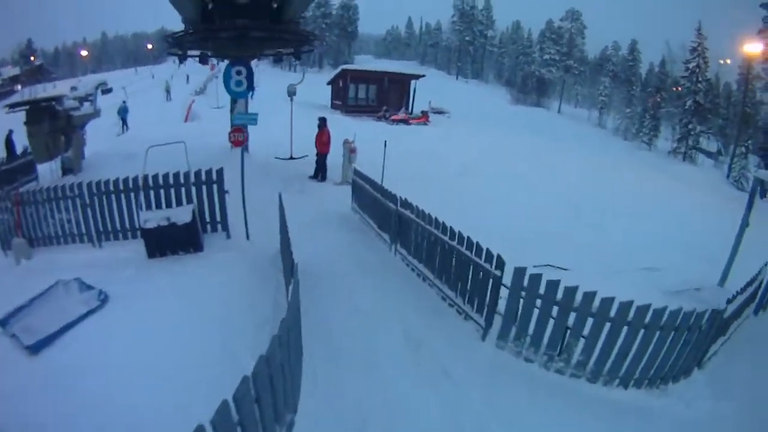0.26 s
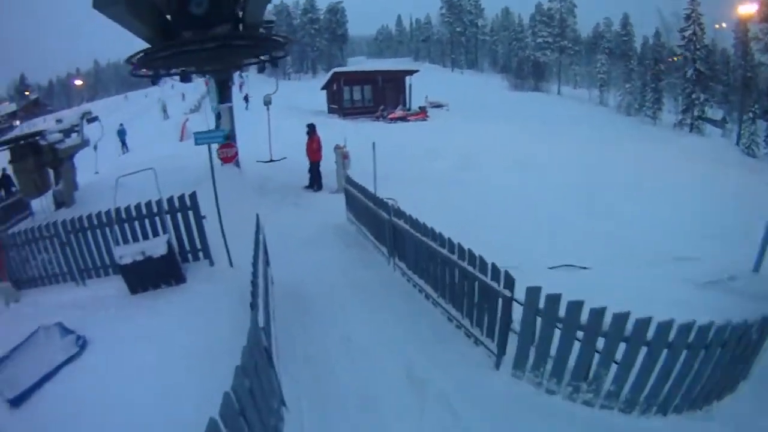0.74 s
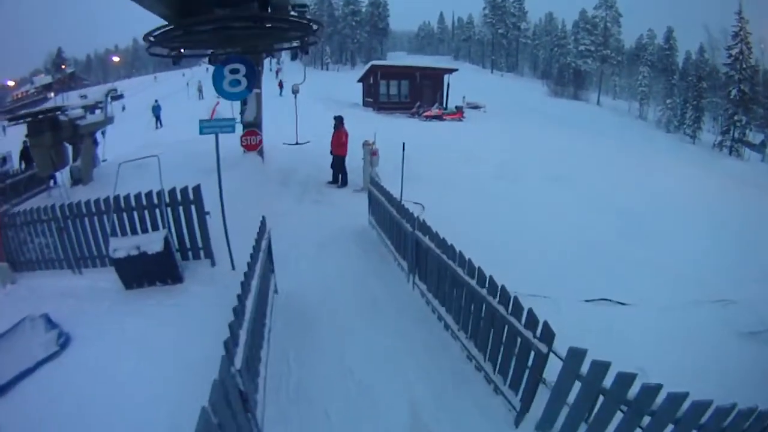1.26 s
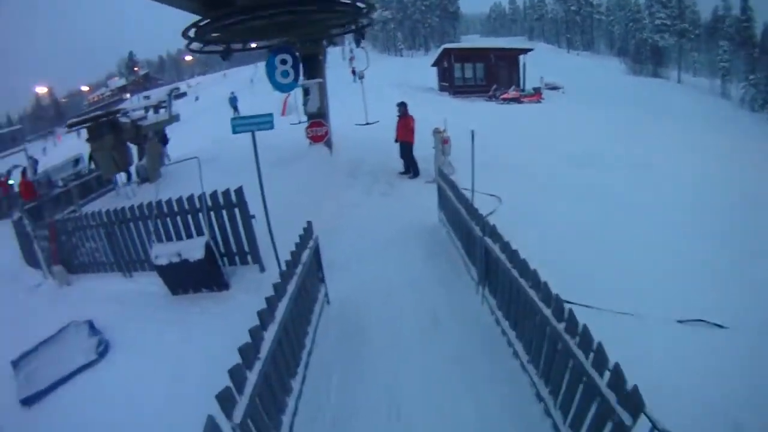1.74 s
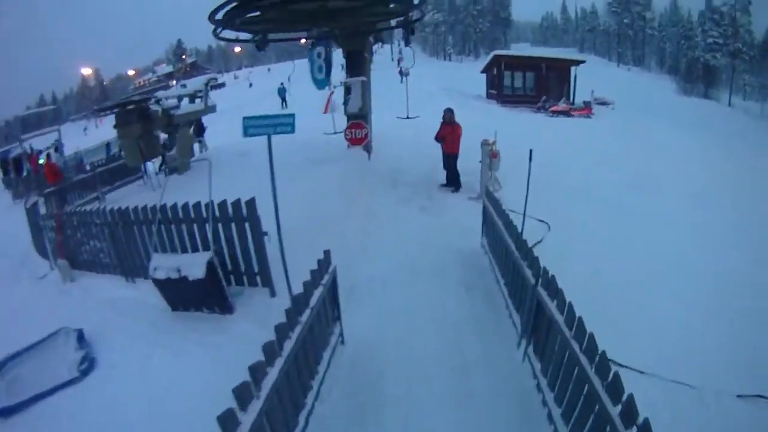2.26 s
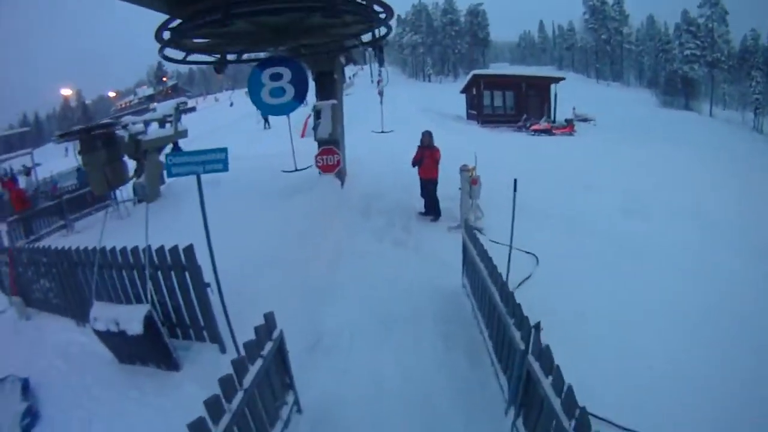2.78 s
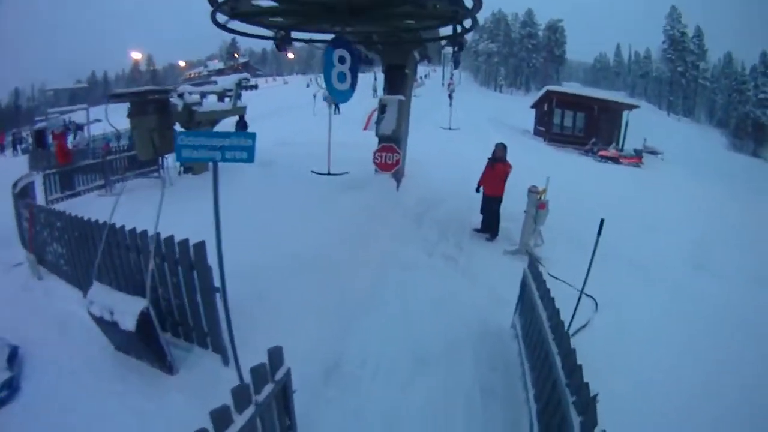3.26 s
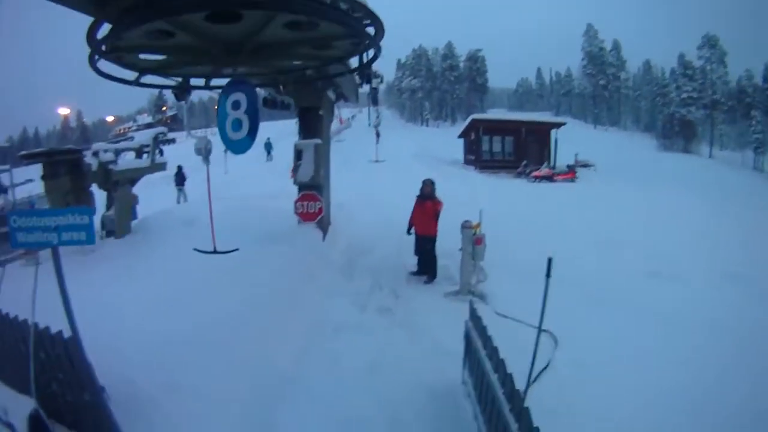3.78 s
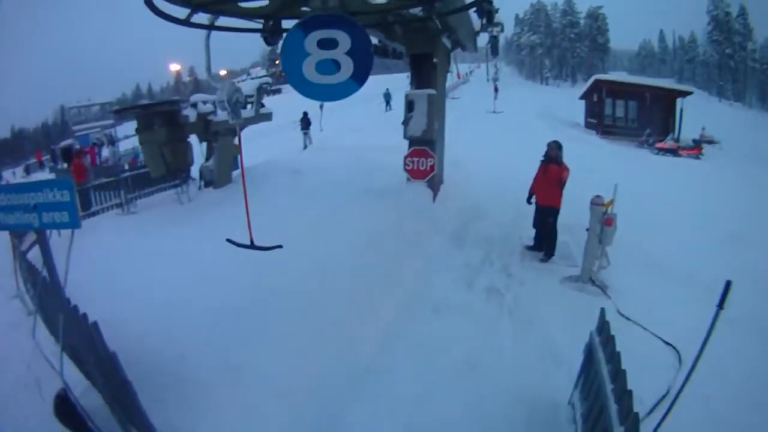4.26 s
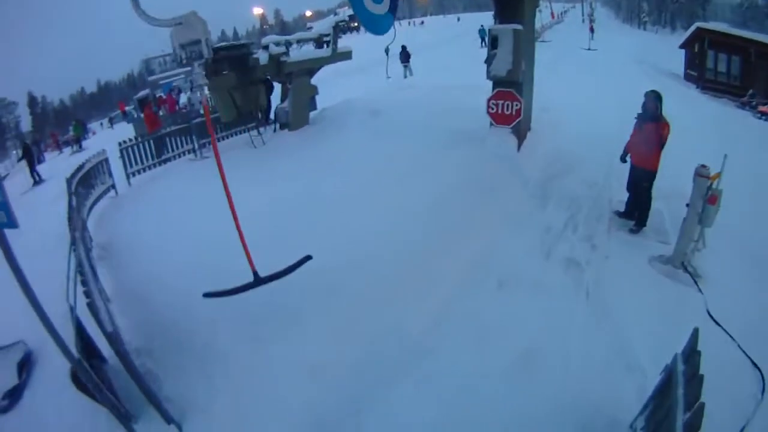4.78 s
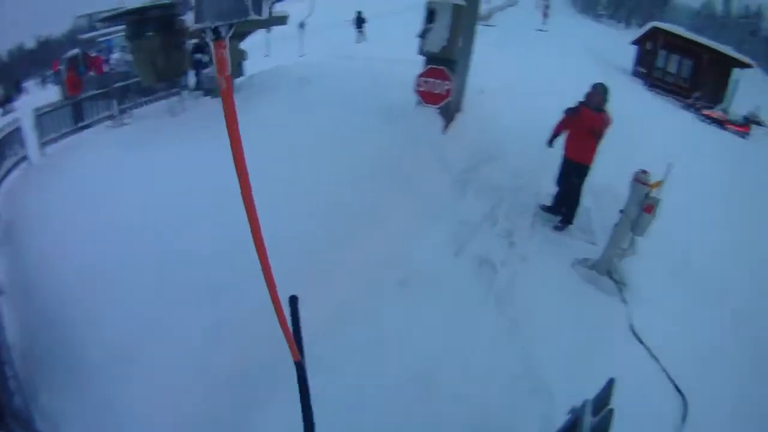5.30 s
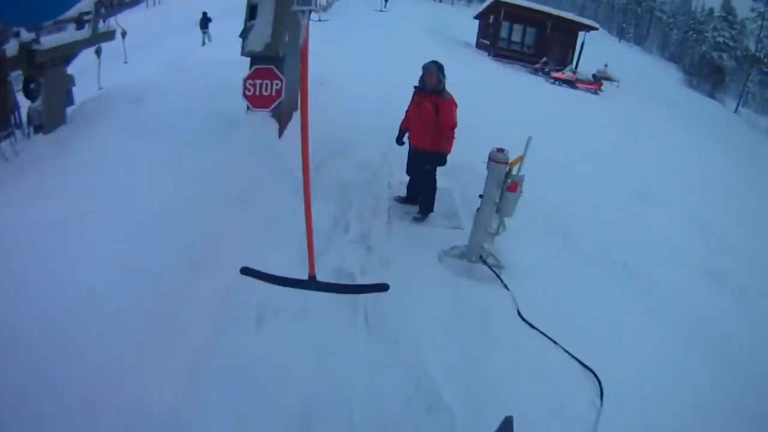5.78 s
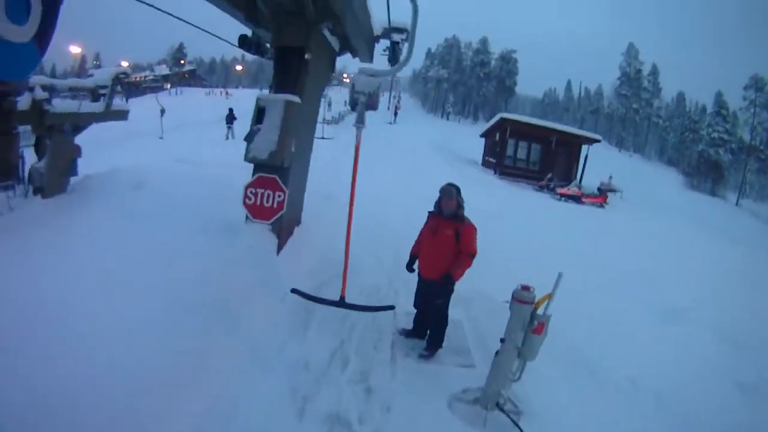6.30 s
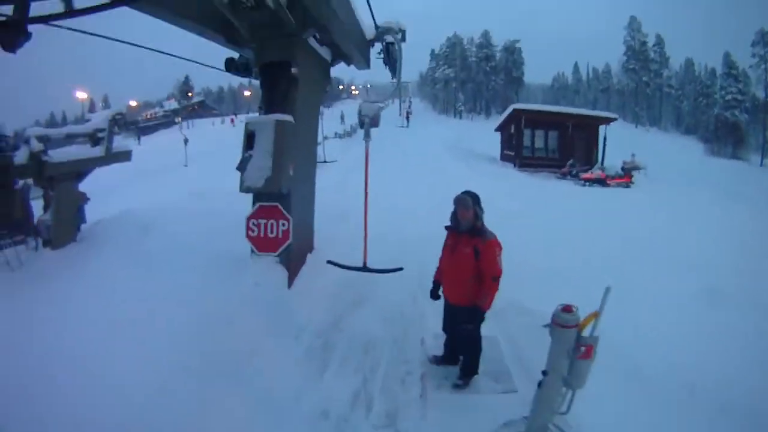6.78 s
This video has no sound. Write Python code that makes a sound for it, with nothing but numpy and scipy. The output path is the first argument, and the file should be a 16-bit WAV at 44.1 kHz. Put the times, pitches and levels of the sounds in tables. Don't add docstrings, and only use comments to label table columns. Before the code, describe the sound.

A ski-lift station hums and roars steadily, growing louder as skis hiss over snow, with two sharp cracks and a short braking squeal.

```python
import sys
import numpy as np
from scipy import signal
from scipy.fft import rfft, irfft, next_fast_len
from scipy.io import wavfile

SR = 44100
rng = np.random.default_rng(int(sys.argv[2]) if len(sys.argv) > 2 else 0)


def pcm_store(signal):
    levels = np.round(np.clip(np.atleast_2d(signal), -1, 1) * 32767)
    wavfile.write(sys.argv[1], SR, levels.astype(np.int16).T)


def ratio(d):
    e = np.asarray(d, float) / 20
    return 10 ** e


N = 310884


def rms_one(x):
    return x / np.sqrt(np.mean(x ** 2) + 1e-20)


def in_time(rows):
    seconds, *columns = np.transpose(rows)
    return [np.interp(np.arange(N) / SR, seconds, column) for column in columns]


def drift(rate_hz):
    r = np.exp(-80 * np.pi * rate_hz / SR)
    noise = rng.standard_normal(N // 40 + 2002)
    slow = signal.lfilter([1], [1, -2 * r, r * r], noise)[2000:]
    return np.interp(np.arange(N) / 40, np.arange(len(slow)), rms_one(slow))


def zone(centre_s, half_width_s):
    t = np.arange(0, N, 64) / SR
    return np.exp(-((t - centre_s) / half_width_s) ** 2).repeat(64)[:N]


def resonate(x, hz, width_hz):
    r = np.exp(-np.pi * width_hz / SR)
    poles = [1, -2 * r * np.cos(2 * np.pi * hz / SR), r * r]
    return signal.lfilter([(1 - r * r) / 2, 0, (r * r - 1) / 2], poles, x)


def band(x, low_hz, high_hz):
    return signal.sosfilt(signal.butter(2, [low_hz, high_hz], "band", fs=SR, output="sos"), x)


def response(spectrum, low_hz, high_hz, size=16384):
    hz = np.maximum(np.arange(size // 2 + 1) * SR / size, 1)
    points = np.array(spectrum)
    log_gain = np.log(ratio(np.interp(np.log(hz), np.log(points[:, 0]), points[:, 1])))
    inside = (hz > low_hz) & (hz < high_hz)
    log_gain -= np.log(np.sum(np.exp(2 * log_gain[inside])) / len(hz)) / 2
    cepstrum = irfft(log_gain, size)
    cepstrum[1:size // 2] *= 2
    return irfft(np.exp(rfft(cepstrum[:size // 2], size)), size)[:size // 2]


def coloured(x, spectrum, low_hz, high_hz):
    return signal.oaconvolve(x, response(spectrum, low_hz, high_hz))[:N]


def by_place(x, spectra, place, low_hz, high_hz):
    return sum(np.clip(1 - abs(place - k), 0, 1) * coloured(x, spectrum, low_hz, high_hz)
               for k, spectrum in enumerate(spectra))


def patchy(x, patchy_db, common_db, count=22):
    size = next_fast_len(N)
    hz = np.maximum(np.arange(size // 2 + 1) * SR / size, 20)
    position = np.log2(hz / 20) / 10 * (count - 1)
    spectrum, together = rfft(x, size), drift(13.0)
    out = 0
    for k in range(count):
        part = irfft(spectrum * np.clip(1 - abs(position - k), 0, 1), size)[:N]
        out = out + ratio(common_db * together + patchy_db * drift(2.06)) * part
    return out


def grains(per_s, spread_db):
    sizes = ratio(spread_db * np.minimum(rng.exponential(1, N), 5)) * rng.choice([-1, 1], N)
    return rms_one(sizes * (rng.random(N) < per_s / SR))


def contacts(click_share):
    clicks = grains(900 * ratio(3.0 * drift(25)), spread_db=3.0)
    return rms_one(click_share * clicks + rng.standard_normal(N))


def knocks(rows, t60_s, rise_ms):
    out, t = np.zeros(N + 4096), np.arange(4096) / SR
    for s, db, hz in rows:
        push = 1 - np.exp(-1000 * t / max(rise_ms, .2))
        ring = push * ratio(-60 * t / t60_s) * np.sin(2 * np.pi * hz * t + rng.uniform(0, 2 * np.pi))
        out[round(s * SR):][:4096] += ratio(db - 7.5) * ring / abs(ring).max()
    return out[:N]


def point_contacts(rows):
    out, impulse = np.zeros(N + 1024), np.eye(1, 1024)[0]
    thud = band(impulse, 900, 4600)
    for s, db, hz, width_hz, thud_db in rows:
        ring = resonate(band(impulse, 0.55 * hz, 1.45 * hz), hz, width_hz)
        out[round(s * SR):][:1024] -= ratio(db) * (ring / abs(ring).max() + ratio(thud_db) * thud / thud.max())
    return out[:N]


def gearbox(place):
    # seconds, level of the hum in dB rms; the third order lies 2.5 dB above it
    hum = [(0, -68), (.5, -69), (1.0, -80), (1.5, -65.5), (1.7, -65.5), (2.4, -62), (2.85, -65),
           (3.15, -66.5), (3.45, -62), (4.08, -60), (4.25, -58.5), (4.8, -54.5), (5.0, -59.5), (5.6, -57.5),
           (5.72, -62), (6.1, -68.5), (6.6, -71.5), (7.05, -59)]
    # multiple of the tooth rate, level in dB, share of the hum's swing, dB per place
    low_orders = [(1, -78.5, 0.27, 10), (2, -75.5, 0.71, 6.5)]
    # multiple of the tooth rate, dB re the hum, dB per place
    upper_orders = [(4, -8.5, -10.5), (5, -11, -8.5), (6, -1.5, -5), (7, -17, -2), (9, -6, 4)]
    # multiple of the tooth rate, centre in s, half width in s, gain in dB
    zones = [(1, 1.8, 0.94, 4), (1, 4.9, 0.2, -4), (1, 2.8, 0.28, -5.5), (3, 4.92, 0.055, -21),
             (3, 5.5, 0.13, 7), (3, 6.3, 0.037, 14), (3, 4.4, 0.037, -0.5), (2, 7.5, 0.047, -11),
             (1, 4.6, 0.24, 2), (2, 1.5, .2, 7.5), (2, 3.67, 0.45, 6), (2, 2.9, 0.17, 6),
             (2, 7.7, 0.15, -6), (2, 7, 0.16, -1.5), (4, 5, .35, 1.5), (5, 1.63, .2, 16),
             (5, 2.45, 0.26, 12), (5, 3.1, .25, 15), (5, 4.34, 0.27, 7.5), (6, 2.1, .5, 4.5),
             (6, 5.4, .35, -6.5), (6, 4.4, 0.18, 5), (7, 2.86, 0.27, 13), (7, 3.7, 0.21, 18.5),
             (7, 3.2, .15, 10), (2, 5.6, .25, -4), (9, 2.45, .1, 7), (9, 4.1, .15, 2.5), (9, 10, .12, 8),
             (9, 6.8, .2, 8), (9, 5.5, .15, 6.5), (2, 5.5, .15, -15), (1, 5.7, 0.22, 1.5), (1, 8.7, .1, 1),
             (3, 4.5, 0.054, 3), (3, 5.2, .1, -2), (3, 5.58, .06, 2), (1, 0.059, .15, -10),
             (2, 1.25, .12, 1), (2, 3.8, .12, -5), (3, 4.47, 0.065, -3), (3, 5.1, .05, -4),
             (3, 5.8, .04, -1), (3, 4.04, 0.041, -8), (1, 6.75, .25, -3.5), (1, 2.24, .1, -4),
             (3, 2, 0.13, -1)]
    tooth_hz, hum_mean_db, low_fading_db = 185.25, -62, 1.2
    turn = 2 * np.pi * tooth_hz * np.arange(N) / SR + .15 * drift(3) + .07 * drift(25)
    hum_db, = in_time(hum)
    orders = [(k, db + share * (hum_db - hum_mean_db) + stage_db * place + low_fading_db * drift(4.6))
              for k, db, share, stage_db in low_orders]
    orders += [(3, hum_db + 2.5)]
    orders += [(k, hum_db + db + stage_db * place) for k, db, stage_db in upper_orders]
    teeth = 0
    for k, db in orders:
        zone_db = sum(gain_db * zone(s, width_s) for j, s, width_s, gain_db in zones if j == k)
        teeth = teeth + ratio(db + zone_db + 2.1 * drift(9.9)) * np.sin(k * turn + rng.uniform(0, 2 * np.pi))
    return np.sqrt(2) * teeth


def motor():
    t, under = np.arange(N) / SR, zone(6.43, 0.69)
    return np.sqrt(2) * sum(ratio(db + gained_db * under + 2.7 * drift(5.2)) * np.sin(2 * np.pi * hz * t)
                            for hz, db, gained_db in [(200.5, -83, 18), (300, -79.5, 9)])


def sheave_whines(near_db):
    # frequency in Hz, level in dB rms, wander in Hz, flutter in dB, end of the fade-out in s
    bearings = [(1242, -63, 6.0, 3.5, 5.4), (1390, -66, 7.97, 1.5, 4.7), (1664, -60.5, 6.96, 3.5, 7.5),
                (2425, -69, 14.94, 4, 4.97), (4160, -74.5, 15.0, 3.0, 5.0)]
    t, fade_s, out = np.arange(N) / SR, .25, 0
    for hz, db, wander_hz, flutter_db, end_s in bearings:
        level = ratio(db + .8 * near_db + flutter_db * drift(6.2)) * np.clip((end_s - t) / fade_s, 0, 1)
        out = out + level * np.sin(2 * np.pi * np.cumsum(hz + wander_hz * drift(4.01)) / SR)
    return np.sqrt(2) * out


def rope_roar(near_db, place):
    # frequency in Hz, density in dB per Hz
    colours = [
        [(350, -35), (600, -7.5), (782, -10), (920, -3.5), (999, -6), (1260, -1), (1490, -2), (1630, -3),
         (1720, -7.5), (1830, -5), (2110, -8.5), (2380, -7), (2600, -21), (2700, -27), (3510, -17.5),
         (5940, -120)],
        [(350, -34.5), (600, -8), (647, -17.5), (870, -12.5), (1030, -15), (1210, -8.5), (1310, -11),
         (1450, -11.5), (1650, -3.5), (1720, -5), (1780, -11.5), (2020, -23), (2430, -17.5), (2700, -27),
         (3510, -58.5), (5940, -120)],
        [(350, -45), (600, -9), (875, -14), (1070, -6), (1160, -18), (1360, -8.5), (1440, -4), (1640, -1),
         (1720, -7), (1780, -5.5), (1970, -6), (2180, -23.5), (2520, -34), (2700, -15), (3510, -48),
         (5940, -120)],
    ]
    rubbing = patchy(contacts(click_share=0.28), patchy_db=0.8, common_db=0.57)
    return ratio(-52 + 0.82 * near_db - 0.081 * place) * by_place(rubbing, colours, place, 564, 1377)


def casing_rattle(near_db, place):
    # mode in Hz, width in Hz, level in dB, dB per place, share of the shake
    modes = [(1689, 7.1, 1.5, -0.5, 0.92), (1660, 51, 5, -3.5, 1), (1590, 16, -4.5, 4, 0.28),
             (1234, 12, -4, -2.5, 0.26), (2415, 70, -1.5, -5, .1), (4210, 40, -13, 0, .1),
             (291.6, 32, -24, 9.5, .5), (552, 35, -8, 1, .1), (1394, 12, -9, -1, 0.11)]
    # seconds, level in dB re mean
    shake = [(0, -5), (.25, -20), (.8, 1.5), (1.35, -4.5), (1.55, -9), (1.85, -2), (2.2, -3), (2.33, 0),
             (2.36, 10.5), (2.56, 2), (2.62, -8), (2.85, -5), (3.26, 4.5), (3.5, -11), (4.0, 1), (4.65, 0),
             (5.46, -13), (6.0, 7.5), (6.3, 9.5), (6.55, 9), (7.05, -13)]
    shaking, (shake_db,) = contacts(click_share=0.13), in_time(shake)
    level_db = -53 + 0.24 * near_db + 1.2 * place - 1.6 * drift(5.1)
    rung = 0
    for k, (hz, width_hz, db, stage_db, share) in enumerate(modes):
        mode = rms_one(resonate(shaking, hz, width_hz))
        rung = rung + (-1) ** k * ratio(db + stage_db * place + share * shake_db) * mode
    return ratio(level_db - 8.5) * rung


def rope_gear():
    # start in s, peak in dB, ring in Hz
    gear = [(1.043, -36.5, 1664), (1.5943, -35, 1607), (2.36, -32, 1620), (2.6958, -34, 1655),
            (3.4074, -33.5, 1590), (3.8471, -34, 1650), (3.9813, -38, 1670), (4.189, -35, 1660),
            (4.3414, -32, 1640), (4.5238, -28, 1684), (4.797, -43, 1600), (5.0582, -42, 1630),
            (5.1606, -37, 1710), (5.3117, -49, 1590), (5.4734, -41, 1590), (5.6404, -31, 1676),
            (5.6636, -26, 1663), (5.693, -48, 1600), (5.8174, -29.5, 1650), (5.885, -30, 1660),
            (5.9032, -33, 1665), (5.9975, -28.5, 1676), (6.1594, -47, 1690), (6.2951, -29, 1645),
            (6.4633, -35, 1647), (6.733, -36, 1620), (6.8144, -33, 1645), (6.786, -34, 1610),
            (5.7337, -42, 1760), (0.335, -34, 1600), (.754, -37, 1570), (1.717, -40, 1590),
            (1.898, -37, 1570), (2.138, -38, 1670), (2.531, -36, 1665), (2.805, -35, 1617),
            (2.952, -38, 1660), (3.039, -35, 1656), (3.274, -37, 1530), (3.386, -34, 1620),
            (3.482, -34, 1655), (3.945, -32, 1674), (4.838, -29.5, 1647), (5.125, -32, 1634),
            (5.526, -34, 1664), (.321, -42, 1240), (.752, -49, 1360), (1.113, -51, 1320),
            (1.726, -39, 1260), (1.989, -35.5, 1220), (2.454, -41, 1270), (2.545, -43, 1280),
            (2.819, -40, 1400), (4.906, -39, 1230), (4.012, -47, 917), (.075, -41, 835), (5.31, -45, 1650),
            (5.58, -46, 1650), (5.71, -33, 1640)]
    # start in s, peak in dB, ring in Hz
    jangle = [(6.09, -48, 1190), (6.118, -39, 1120), (6.186, -40, 970), (6.254, -37, 980),
              (6.307, -38, 1050), (6.346, -37, 1030), (6.381, -38, 1060), (6.445, -45, 1040),
              (6.608, -38, 1224)]
    # start in s, peak in dB, ring in Hz
    clanks = [
        (2.3585, -39, 1400),
        (0.5208, -26.5, 1630),
        (6.8476, -28, 1650),
    ]
    return (knocks(gear, t60_s=0.095, rise_ms=1.1) + knocks(jangle, t60_s=.028, rise_ms=4.7)
            + knocks(clanks, t60_s=0.025, rise_ms=.4))


def cracks():
    # start in s, peak in dB
    blows = [
        (3.8814, 1.5),
        (4.592, -11),
    ]
    # frequency in Hz, density in dB per Hz
    colours = [
        [(60, -45), (300, -34.5), (1320, -14), (1840, -15.5), (4300, -14.5), (4910, -18.5), (5520, -26),
         (6000, -16), (6410, -8.5), (8500, -2), (12300, -15), (13100, -24), (14000, -42), (15200, -26),
         (16000, -42)],
        [(200, -33), (400, -21), (1180, -5.5), (4440, -1.5), (6950, 4), (7990, -2), (9610, 0.5), (12100, -17),
         (14600, -15), (15300, -17), (16000, -29.5)],
    ]
    out = np.zeros(N)
    for (s, db), colour in zip(blows, colours):
        crack = response(colour, 1000, 12000, size=2048)
        out[round(s * SR):][:len(crack)] -= ratio(db) * crack / abs(crack).max()
    return out


def ski_edges():
    # seconds, level in dB
    scrape = [(4.9, -80), (5.05, -66), (5.3, -56), (5.5, -50.5), (5.65, -51.5), (5.76, -57), (5.82, -66),
              (5.9, -90)]
    # mode in Hz, width in Hz, level in dB, dB per s as the edges bite
    modes = [(3090, 92, -2, -5), (3600, 66, -5, -5), (4580, 250, 0.5, 0.1), (6000, 350, -2.5, -11.5),
             (6350, 350, -4, 13), (8200, 350, -9, -6), (8870, 350, -16, 12)]
    slips = grains(1200 * ratio(3.0 * drift(30)), spread_db=2.5)
    since_bite_s = np.clip(np.arange(N) / SR - 5.55, -1, 1)
    squeal = sum(ratio(db + bite_db * since_bite_s) * rms_one(resonate(slips, hz, width_hz))
                 for hz, width_hz, db, bite_db in modes)
    return ratio(in_time(scrape)[0]) * rms_one(band(squeal, 2200, 9000))


def snow_hiss(air, near_db, casing_place, port_place):
    # frequency in Hz, density in dB per Hz
    colours = [
        [(1530, -44), (2600, -10.5), (2910, -6), (3320, -17), (4000, -6.5), (4600, -4), (5340, -14),
         (6470, 0.5), (7510, -14.5), (8390, -14), (9000, -13.5), (9600, -21), (10400, -19), (11500, -29.5),
         (13400, -26.5), (14600, -33), (15300, -25)],
        [(1530, -36), (2600, -12), (2990, -4), (3270, -8.5), (3630, -0.5), (4000, -9), (5380, -3), (5830, 0.5),
         (6190, 2), (6620, -1.5), (7400, -16), (8210, -8), (9310, -19.5), (13600, -28.5), (15300, -39)],
        [(1530, -31), (2600, -12), (2970, -4.5), (4370, -10.5), (5540, -8.5), (7450, -15.5), (7620, -21),
         (8090, -18.5), (8770, -15.5), (9660, -18.5), (11900, -30.5), (12900, -28), (15300, -33)],
    ]
    return ratio(-52 + 1.38 * near_db - 0.66 * casing_place) * by_place(air, colours, port_place, 2660, 12000)


def wind():
    # start in s, length in s, level in dB, upper part in dB re lower
    gusts = [(-0.02, 0.1, -59, -10), (0.123, 0.052, -57, -16), (0.59, 0.037, -64, -11),
             (0.72, 0.127, -58.5, -25), (0.858, 0.107, -58, -25), (1.142, 0.18, -57.5, -28),
             (1.193, .07, -58.5, -25), (1.117, 0.034, -66, -25), (1.388, 0.043, -59, -12),
             (1.436, 0.039, -54, 0), (6.274, 0.071, -57, -13)]
    # start in s, peak in dB, ring in Hz
    eddies = [(0.069, -51, 541), (0.139, -57, 550), (0.611, -42, 440), (0.759, -47, 540), (0.819, -45, 161),
              (0.869, -46, 406), (1.138, -43, 448), (1.164, -41, 560), (1.194, -41, 393), (1.225, -36, 354),
              (1.244, -43, 510), (1.284, -39, 484), (1.304, -41, 415), (1.408, -40, 407), (1.434, -46, 498),
              (1.47, -37.5, 495), (.725, -42, 210), (.885, -50, 186), (.942, -42, 190), (1.22, -50, 179),
              (1.272, -53, 185), (1.443, -51, 203), (1.455, -43, 849), (1.471, -49, 953), (1.476, -56, 320)]
    rise_s, fall_s = 0.016, 0.011
    lumpy = rng.standard_normal(N) * ratio(1.5 * drift(90))
    low = rms_one(band(band(lumpy, 150, 660), 67, 760))
    high = rms_one(band(lumpy, 780, 1100))
    t, out = np.arange(N) / SR, knocks(eddies, t60_s=.027, rise_ms=4.3)
    for s, length_s, db, upper_db in gusts:
        shape = np.clip(np.minimum((t - s) / rise_s, 1 + (s + length_s - t) / fall_s), 0, 1) ** 2
        out = out + shape * ratio(db) * (low + ratio(upper_db) * high)
    return out


def ice_ticks():
    # start in s, peak in dB, ring in Hz, width in Hz, thud in dB re ring
    ice = [(0.8666, -33.5, 5600, 1590, -6), (.8667, -51, 13000, 5000, -20), (.9051, -43, 11800, 1500, -8),
           (.918, -39, 7500, 4000, -9), (.918, -52, 12500, 500, -20), (1.5232, -40, 3600, 500, -10),
           (1.5345, -42, 8000, 6000, -3), (2.48, -47, 11500, 4000, -10), (3.3608, -40, 9600, 4500, -18),
           (3.3608, -28.5, 4300, 2500, -12), (3.3608, -29, 7000, 2500, -17), (.9058, -38, 6000, 700, -8),
           (4.5872, -21, 11000, 5000, -14), (4.705, -34, 1940, 80, -12), (4.706, -35, 1500, 110, -20),
           (4.705, -35, 1010, 90, -29), (5.727, -47, 8700, 300, -20), (5.782, -46, 11500, 2500, -20),
           (5.742, -52, 10500, 2500, -20), (5.75, -36, 6000, 1500, -20), (5.893, -44.5, 8850, 200, -20),
           (5.913, -38.5, 5760, 395, -28), (6.733, -43, 5940, 200, -6), (6.735, -37, 5070, 300, -8),
           (6.7362, -42, 8500, 2000, -6), (6.738, -41, 4400, 400, -8), (6.735, -45, 3300, 500, -6),
           (6.738, -45, 2400, 400, -6), (4.705, -37, 2750, 400, -4)]
    return point_contacts(ice)


def frost_specks():
    # start in s, peak in dB
    specks = [(.2646, -58), (.5691, -60), (.6514, -59), (.7244, -60), (.8367, -57), (.9013, -56),
              (1.051, -56), (1.1549, -60), (1.518, -51), (1.6271, -52), (1.649, -59), (2.136, -57),
              (2.2785, -60), (2.5249, -54), (2.9518, -53), (3.0329, -60), (3.2184, -52), (3.5163, -56),
              (3.7148, -55), (3.8205, -56), (4.7054, -55), (5.742, -57), (5.8956, -60)]
    return point_contacts([(s, db, 12000, 5000, -20) for s, db in specks])


def rumble(air, near_db, place):
    # frequency in Hz, density in dB per Hz
    colour = [(20, -43), (55, -19), (100, -6), (150, -12), (240, -2.5), (320, -0.5), (560, 2), (700, -34)]
    level_db = -69.5 + 0.27 * near_db + 0.89 * place + 1.5 * drift(3.8)
    return ratio(level_db) * coloured(air, colour, 200, 350)


def foundation_throb(air):
    # level in dB, centre in s, half width in s
    throb = (-76.5, 6.66, 0.49)
    db, centre_s, half_width_s = throb
    return ratio(db) * zone(centre_s, half_width_s) * rms_one(band(air, 65, 125))


def scene():
    # seconds, level in dB re mean
    nearness = [(0, -3), (.4, -3.5), (1.2, -1.5), (1.47, -1.5), (1.55, -0.5), (2.5, 0), (3.4, 1.5),
                (3.75, 0.5), (4.2, 2.5), (4.4, 2.5), (4.65, 4), (5.45, 1.5), (5.7, 0), (5.85, -1.5),
                (6.4, -2), (7.05, -4)]
    # seconds, place as the casing hears it, place as the port hears it
    stages = [(0, 0.084, 0.011), (4.0, 0.32, 0.42), (4.6, 0.58, 0.65), (5.2, 0.94, 1.29), (5.5, 1.4, 1.38),
              (5.75, 1.82, 1.62), (5.95, 1.64, 1.7), (7.05, 1.66, 1.48)]
    near_db, = in_time(nearness)
    casing_place, port_place = np.clip(in_time(stages), 0, 2)
    air = patchy(rng.standard_normal(N), patchy_db=1.53, common_db=1.0)
    machine = gearbox(port_place) + motor() + sheave_whines(near_db) + rope_roar(near_db, casing_place)
    machine = machine + casing_rattle(near_db, casing_place) + rope_gear()
    machine = machine + rumble(air, near_db, casing_place) + foundation_throb(air)
    snow = ski_edges() + snow_hiss(air, near_db, casing_place, port_place)
    at_port = wind() + ice_ticks() + frost_specks()
    top = signal.ellip(12, .5, 80, 15250, fs=SR, output="sos")
    mono = signal.sosfilt(top, machine + snow + at_port) + cracks()
    return np.stack([mono, mono])


def top_cut(x):
    return signal.sosfilt(signal.butter(12, 16220, fs=SR, output="sos"), x)


def record(dry):
    overloaded = np.clip(dry, -.95, .95)
    top = signal.ellip(6, .2, 30, 15600, fs=SR, output="sos")
    return top_cut(signal.sosfiltfilt(top, overloaded))


dry = scene()
out = record(dry)
pcm_store(out)
```